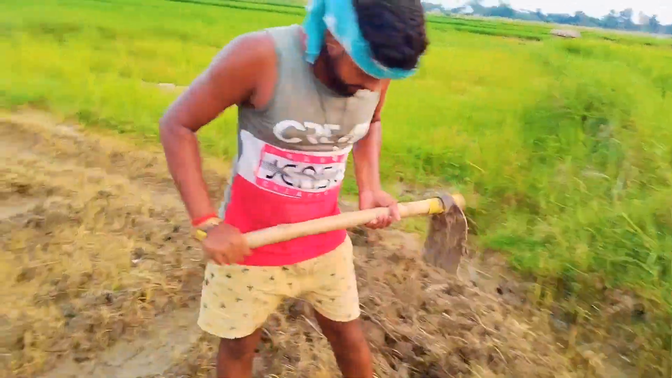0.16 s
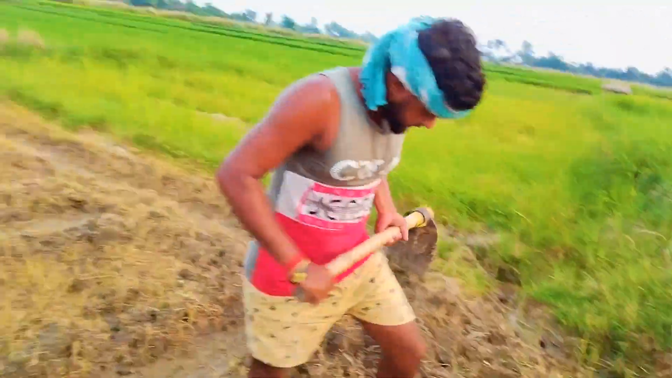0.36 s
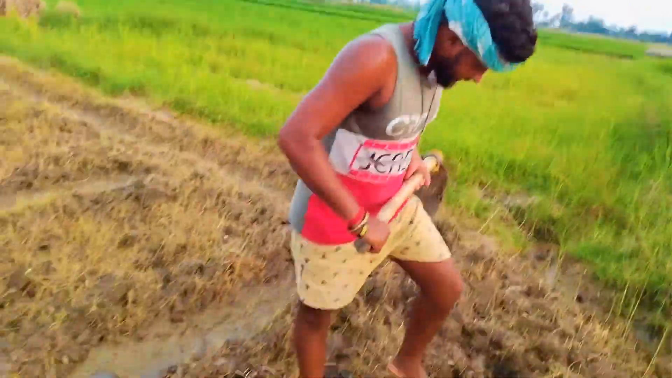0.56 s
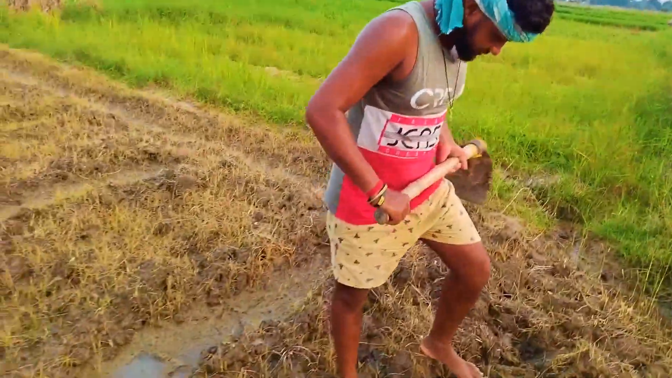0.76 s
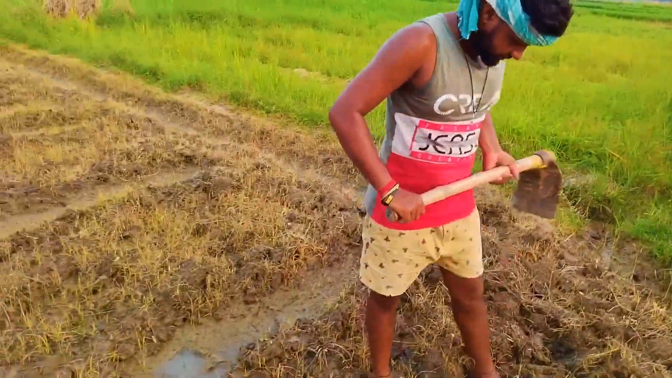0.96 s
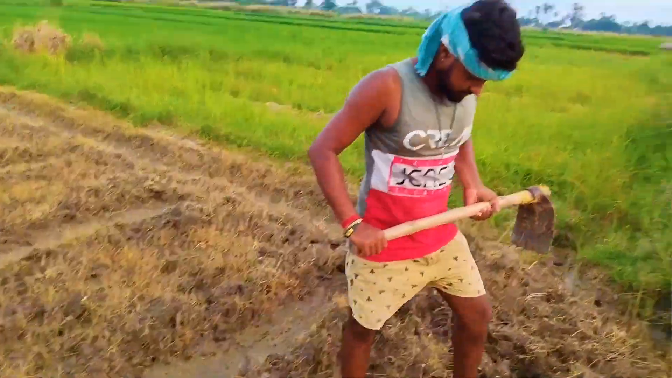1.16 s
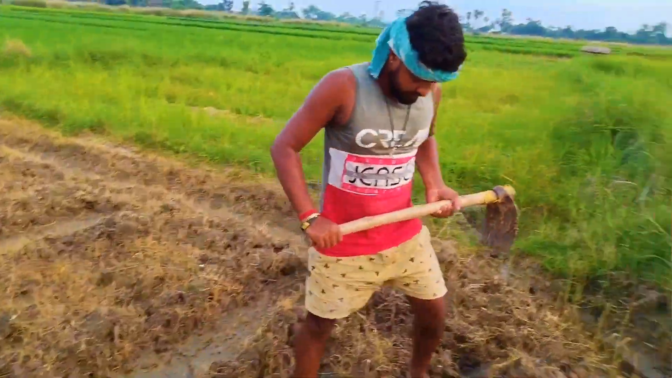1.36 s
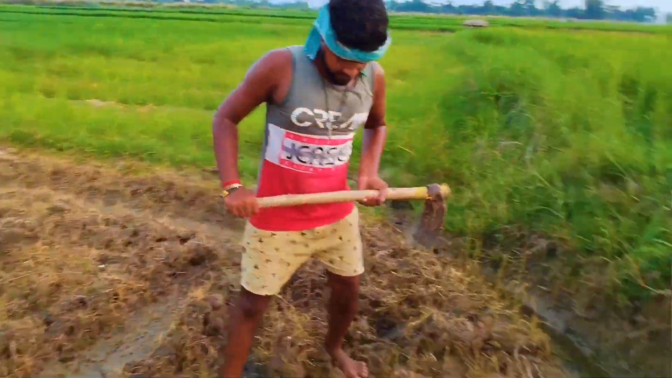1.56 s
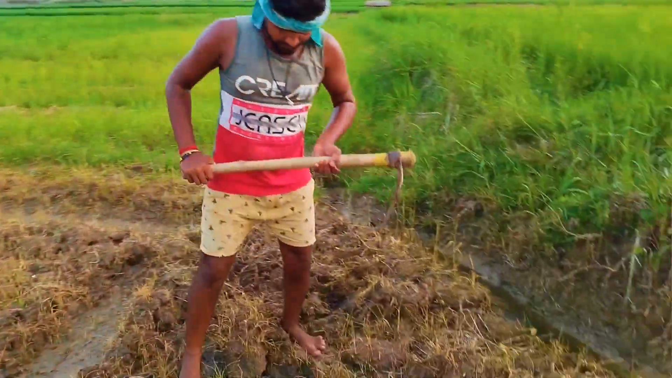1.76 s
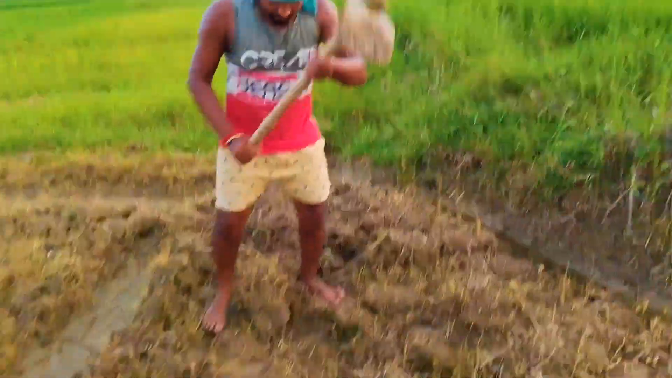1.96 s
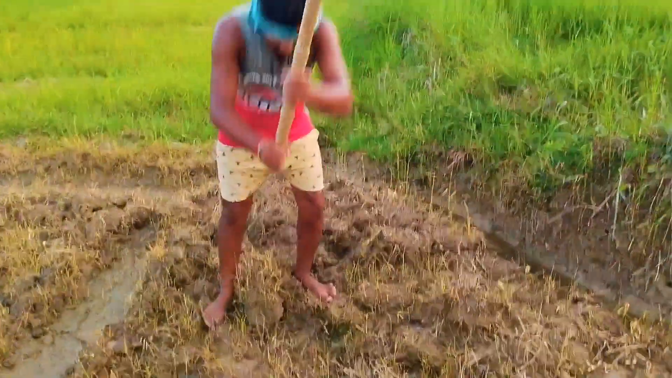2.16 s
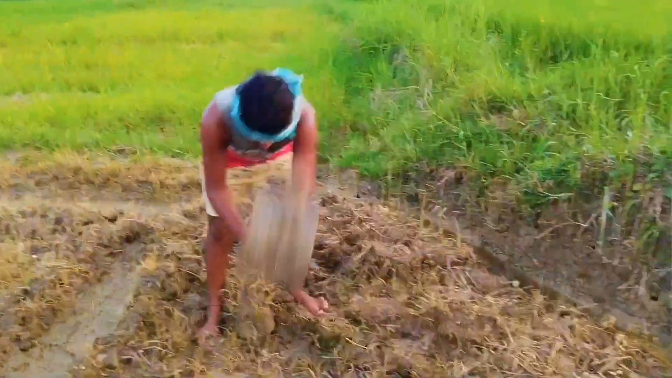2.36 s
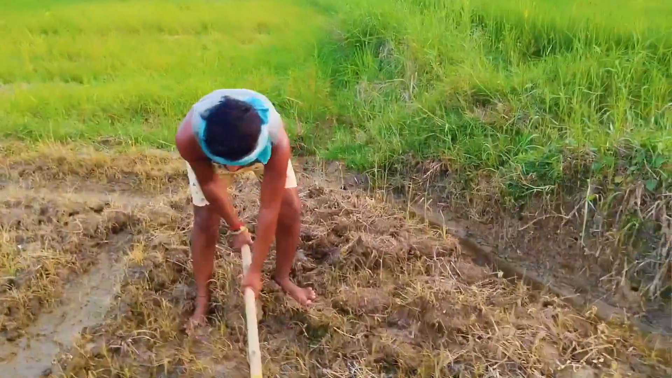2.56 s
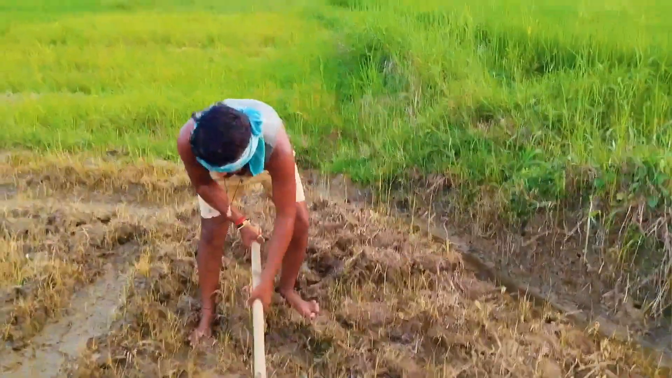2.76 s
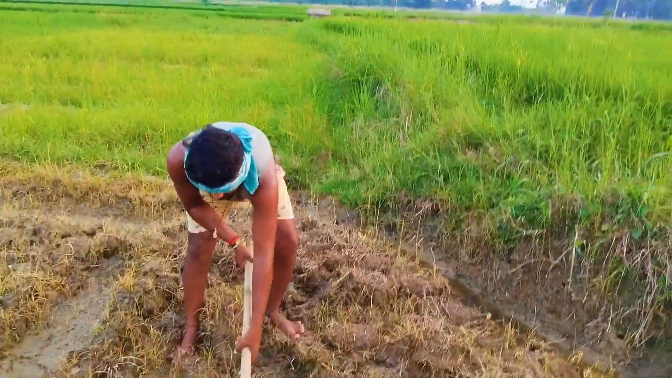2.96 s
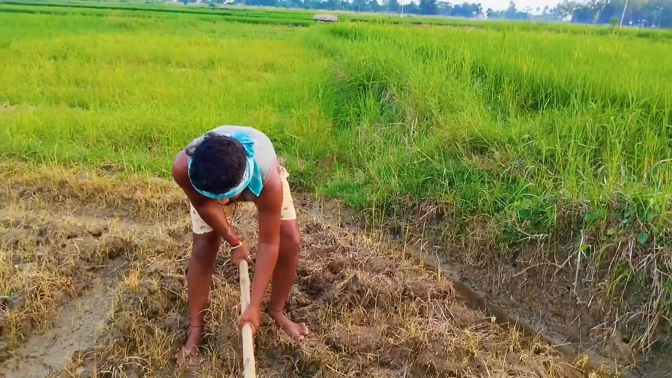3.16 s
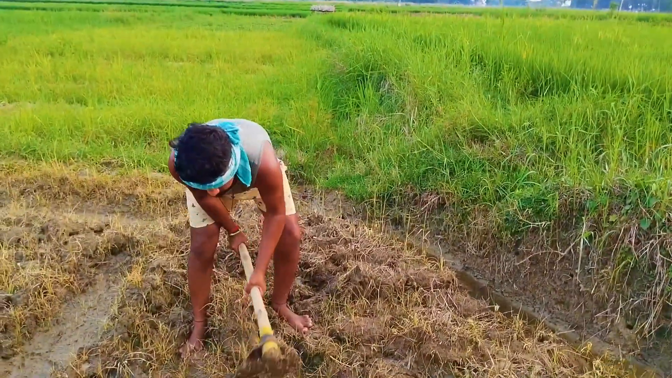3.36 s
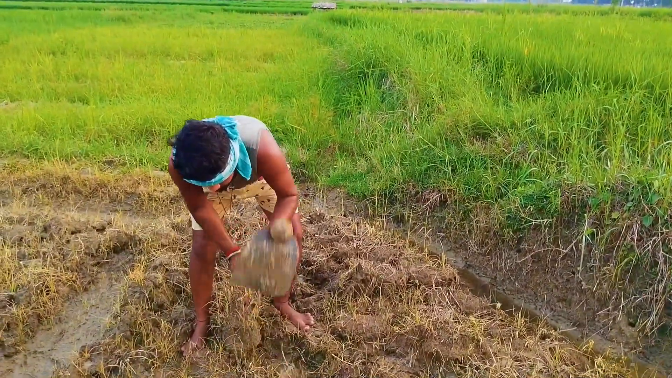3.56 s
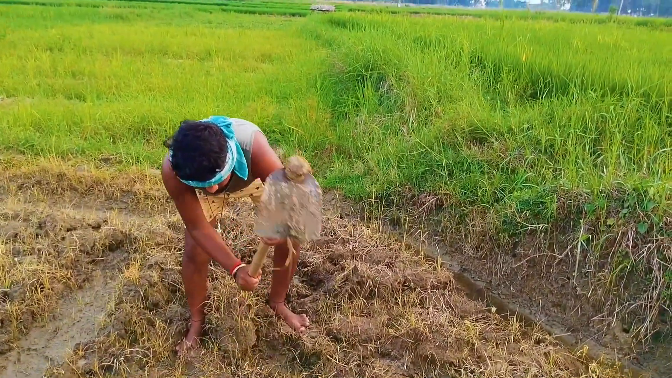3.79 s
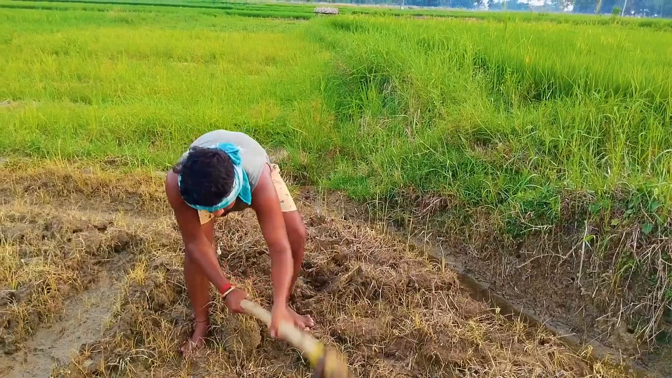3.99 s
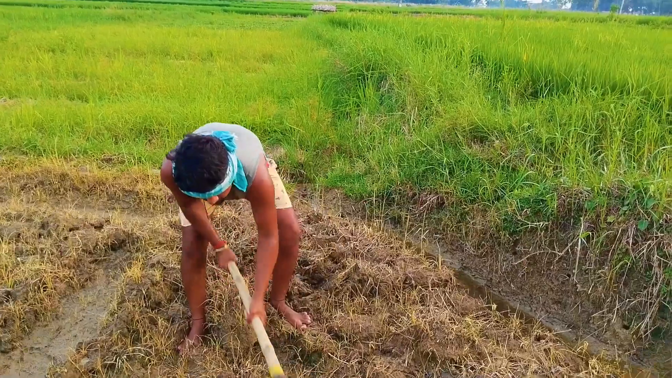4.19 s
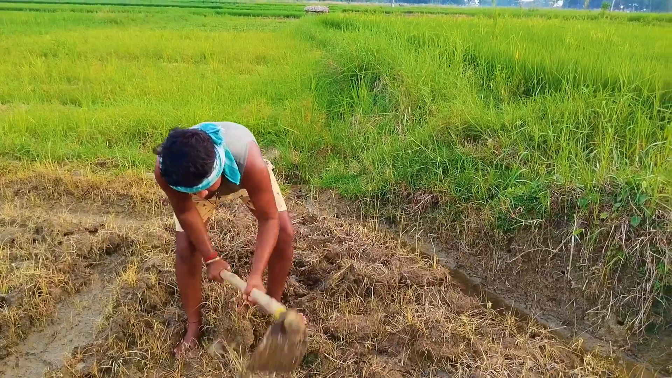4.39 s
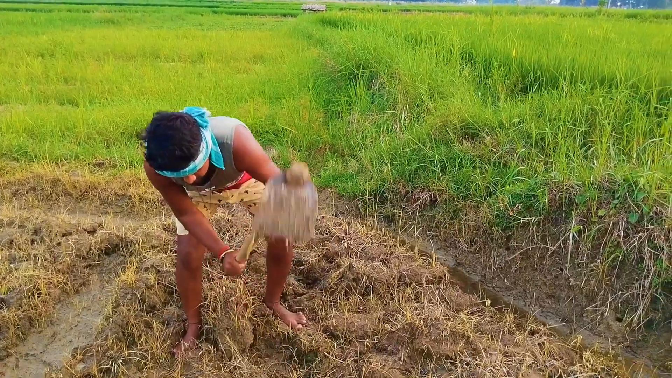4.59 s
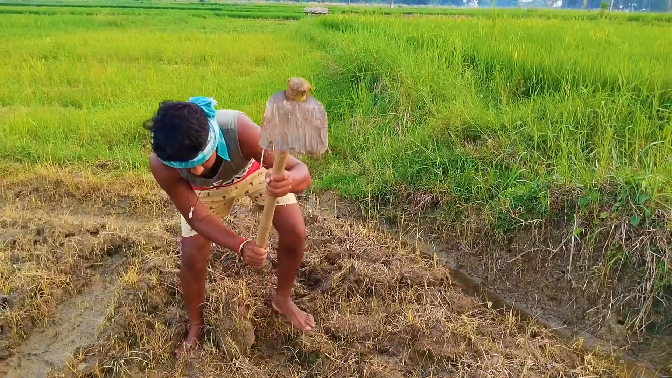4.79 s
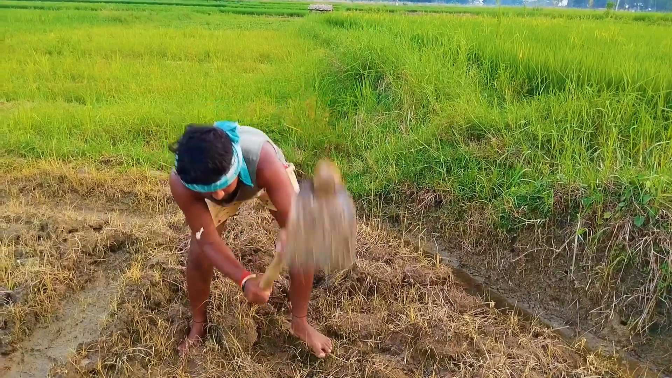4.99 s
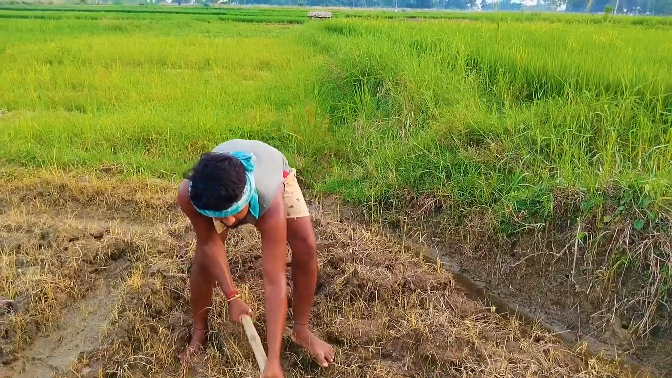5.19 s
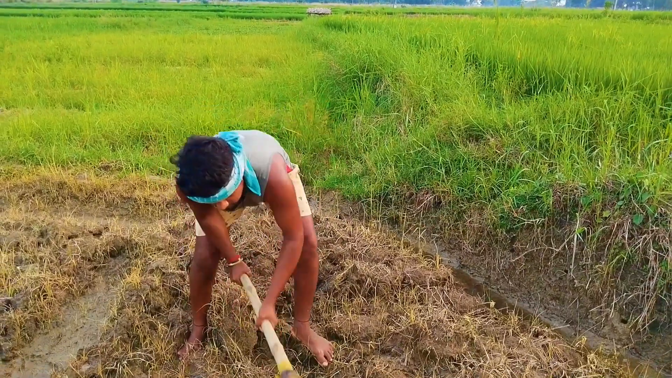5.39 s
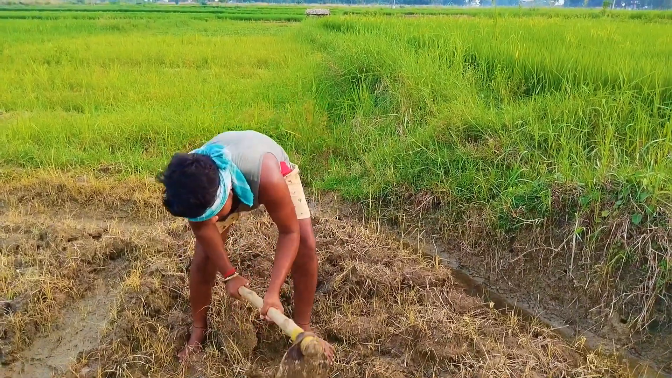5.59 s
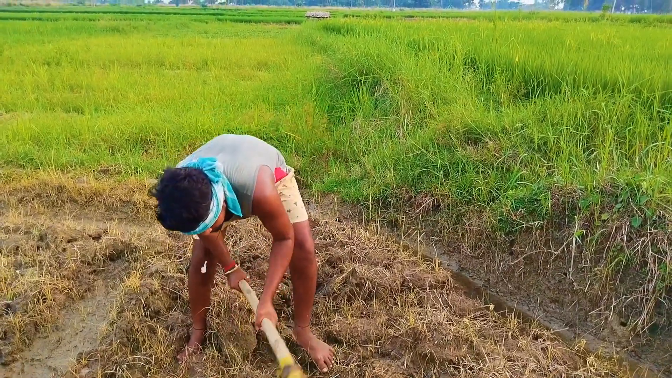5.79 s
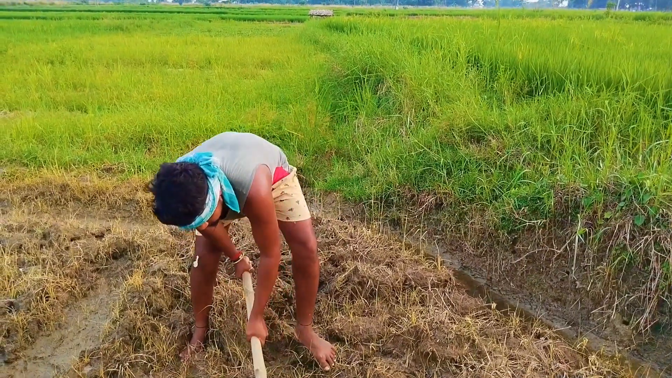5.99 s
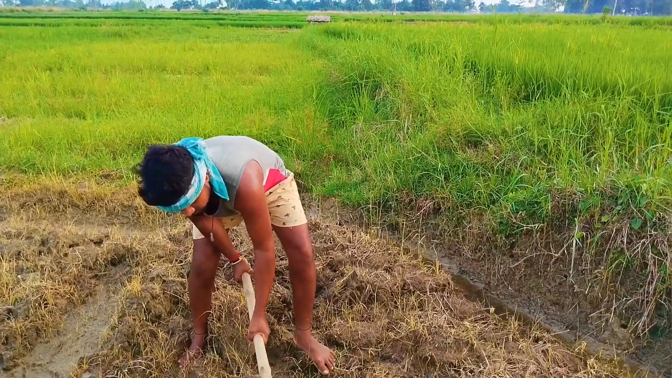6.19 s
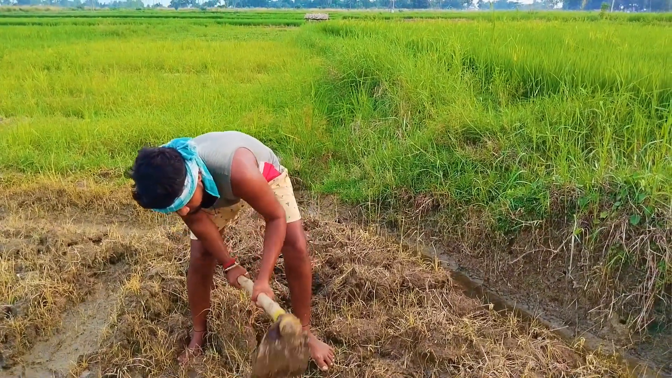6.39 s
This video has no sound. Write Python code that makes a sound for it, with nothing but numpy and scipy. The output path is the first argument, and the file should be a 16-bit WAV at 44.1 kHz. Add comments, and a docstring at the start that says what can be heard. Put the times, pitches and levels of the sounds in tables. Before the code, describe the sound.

Outdoors in an open field, feet shuffle faintly in straw while distant birds call and insects sing. Then a hand hoe strikes dry stubbly soil: three hard, gritty crunches with short ground thuds and a brief damped steel ring, then a lighter one. Between blows, soil drags and sifts, clods knock and stalks snap. The microphone is a few metres away, with a steady low rumble underneath.

```python
"""A hand hoe chops dry, stubbly soil in an open field: three hard blows and a light one, after shuffling steps.
Each blow is a burst of tiny fractures that crunches, with a short ground thud and a brief ring of the steel blade.
Between blows, swelling streams of fractures drag and sift soil, clods knock and dry stalks snap.
Birds call in smeared gliding tones and insects sing in narrow bands of noise.
Shaped noise makes the low rumble and thin air; a faint far drone comes and goes."""
import sys
import numpy as np
from scipy import signal
from scipy.fft import rfft, irfft
from scipy.io import wavfile
from scipy.ndimage import uniform_filter1d

SR = 44100
rng = np.random.default_rng(int(sys.argv[2]) if len(sys.argv) > 2 else 0)


def generate_wav(sig):
    """Save sig (samples, or channels by samples) to the path in sys.argv[1] as 16-bit PCM at SR."""
    pcm = np.round(np.clip(np.atleast_2d(sig).T, -1, 1) * 32767).astype(np.int16)
    wavfile.write(sys.argv[1], SR, pcm)


N = 284004
TIME = np.arange(N) / SR  # seconds through the scene
SIZE = 32768  # samples in one short sound
AGE = np.arange(SIZE) / SR  # seconds through one short sound

# Levels in the tables are settings before the mix; spectrum levels are relative.
# Blows, each cutting the crust and then seating in firm ground: [start_s, cut_db, cut_thud_db, sinking_s,
# seat_db, seat_thud_db, seat_thud_hz, decay_s, brightness_db_per_octave, blade_ring_db (relative to crunch)]
BLOWS = [(2.6476, -22, -28.5, 0.0085, -26.5, -30, 125.4, 0.011, 0.25, -10),
         (4.2211, -26.5, -26, 0.018, -22.5, -16, 293.5, 0.014, -1.9, -22),
         (5.3262, -23, -21.5, .013, -28.5, -34.5, 197, 0.014, 0, -12.5),
         (6.0279, -34.5, -37, 0.021, -38, -53, 260, 0.012, 0.5, -5)]
CUT_THUD_HZ = 262  # the crust's own thud
# Ringing tones of the steel blade on its handle: [pitch_hz, level_db]
BLADE_TONES = [(816, -3), (1020, -12), (1200, -21.5), (1750, 3), (2845, 4.5), (3060, -10.5), (3270, -13),
               (3480, 0.5), (3790, 1.5), (4160, -17.5), (4410, -22), (4820, -5.5)]
BLADE_T60_S = 0.045  # time for the ring to fall by 60 dB
# Colour of the crunch: [frequency_hz, level_db_per_hz]
CRUNCH_COLOUR = [(60, -24), (250, 6.5), (430, 4), (750, 0), (1500, 1), (2500, 0.5), (4500, 2), (6000, -6),
                 (9000, -6), (15500, -8)]
# Stereo width of the soil sounds: [frequency_hz, side_minus_middle_db]
SOIL_WIDTH = [(100, -22), (300, -12), (700, -4), (2500, -9), (6000, -2), (14000, 1)]

# The blade brushes stalks just before it cuts
STUBBLE_DB, STUBBLE_LEAD_S, STUBBLE_RISE_S = -43, 0.0044, 0.0095
# Soil spills after the blade seats; its level is relative to the seating crunch
SPILL_DB, SPILL_DELAY_S, SPILL_FALL_S = -20, 0.013, 0.022
# The blade pulls or levers soil: [peak_s, level_db, swell_s, brightness_db_per_octave, clod_weight_db]
DRAGS = [(2.921, -39.5, 0.033, -7.3, -7.5), (3.292, -49.5, 0.04, -6.5, -9), (3.73, -47.5, 0.017, -2.5, -2),
         (4.295, -41.5, 0.041, -4, -10), (5.435, -51, 0.04, -3.5, -0.5), (5.618, -53, .018, -6, -32),
         (6.378, -52, .023, -1, -1)]
# Loose soil sifts off the blade: [peak_s, level_db, swell_s, brightness_db_per_octave]
SIFTS = [(2.825, -59, 0.036, -7), (3.37, -60, 0.034, -4), (3.505, -58, 0.051, -3.5), (3.79, -58, 0.075, 8),
         (4.48, -66.5, .07, -1.5), (6.126, -66.5, .04, -1.5)]
SIFT_WEIGHT_DB = -20  # few heavy clods among it
# Feet and legs shift in the straw: [peak_s, level_db, swell_s, ground_weight_db]
STEPS = [(.115, -63, 0.062, 1.5), (.5, -67, 0.1, -1.5), (1.0, -65.5, 0.031, 3), (1.155, -60, 0.043, 16),
         (1.64, -63.5, 0.048, 18.5), (1.78, -61, .07, 12.5), (1.949, -65.5, 0.066, -24),
         (2.315, -57, .046, -43), (2.48, -66.5, .06, -17), (5.053, -60.5, .021, 14.5)]
STEP_TILT_DB = -2.5  # brightness per octave
# Colour of rubbed soil: [frequency_hz, level_db_per_hz]
DRAG_COLOUR = [(60, -20.5), (150, -20.5), (270, 3.5), (480, -5), (800, -13), (1800, 0), (3000, 2.5),
               (4500, 5.5), (6500, 0.5), (10000, 1.5), (15500, 0)]

# Clods and stones knock together or against the blade: [start_s, level_db, decay_s, pitch_hz]
KNOCKS = [(.038, -54, 0.0061, 2590), (.1305, -47.5, 0.0049, 1750), (1.741, -46, 0.0034, 1040),
          (2.778, -52, 0.063, 1570), (4.3065, -28, 0.0023, 1490), (4.49, -59, 0.0081, 1980),
          (5.3316, -9, 0.0017, 3240), (5.604, -45, 0.019, 1150), (5.772, -53.5, 0.011, 1270),
          (6.047, -35, 0.012, 1310), (6.162, -56.5, 0.021, 2400), (6.382, -48, 0.0041, 3130)]
KNOCK_WIDTH_SHARE = 0.36  # of the pitch
# Dry stalks snap: [start_s, level_db]
STALK_SNAPS = [(1.148, -43), (3.359, -40), (3.536, -47), (3.645, -52), (3.672, -46), (3.705, -42.5),
               (4.517, -56), (5.498, -43)]
STALK_DECAY_S, STALK_HZ, STALK_WIDTH_HZ = 0.0044, 5030, 11300

# Strength of the near reflection, which changes with the place of the blade: [time_s, share]
BOUNCE = [(2.9, 0.6), (4.25, 0.17), (5.33, 0.73), (6.05, 0.3)]

# A far bird's arched, rasping call: [start_s, length_s, pitch_hz, level_db]
RASPING_CALLS = [(0.301, 0.5, 1916, -64), (1.356, 0.58, 1847, -63), (5.76, .3, 1490, -77)]
CALL_ARCH_HZ, CALL_RASP_HZ = 240, 102
# Thin rising whistles of another bird: [start_s, length_s, pitch_hz, rise_hz, level_db]
WHISTLES = [(0.253, 0.051, 3650, 500, -64), (0.882, 0.24, 2300, 526, -68), (1.257, 0.24, 3090, 90, -72.5)]
WHISTLE_RASP_HZ = 71.5

# Steady insect choirs: [pitch_hz, width_hz, level_db]
CHOIRS = [(7080, 350, -85.5), (7986, 510, -76.5), (9340, 700, -77), (10700, 940, -72.5)]
# Nearness of the choirs: [time_s, level_db]
CHOIR_SWELL = [(0, 4.5), (2, 5.5), (2.7, 3), (5.6, 3), (6.44, 4.5)]
# The cricket sings in bouts: [start_s, end_s, level_db]
CRICKET_BOUTS = [(.25, .55, -70), (1.36, 2.7, -64), (5.2, 6.44, -68)]
CRICKET_FADE_S, CRICKET_REST_DB = 0.08, -74

# Colour of the low rumble: [frequency_hz, level_db_per_hz]
RUMBLE_COLOUR = [(15, -46.5), (28, -26), (39, -7.5), (50, -3), (62, 1), (75, 0), (92, -4), (125, -11),
                 (165, -17), (220, -35), (330, -38), (600, -64)]
# Loudness of the low rumble: [time_s, level_db]
RUMBLE_LEVEL = [(0, -52), (2.4, -52), (4.6, -54), (6.44, -52.5)]
# Colour of the thin open-air hiss: [frequency_hz, level_db_per_hz]
AIR_COLOUR = [(200, 10.5), (450, -39), (650, 1), (1200, -5.5), (2000, -2.5), (3200, -8.5), (5800, -15.5),
              (7200, -7.5), (12000, -5), (15500, 2)]
# A far drone comes and goes: [start_s, end_s, level_db]
DRONE_BOUTS = [(.45, 1.1, -84), (1.58, 2.4, -76), (5.87, 6.44, -82.5)]
DRONE_HZ, DRONE_FADE_S, DRONE_REST_DB = 590, 0.067, -93.5
CUTOFF_HZ = 15700


def from_db(db):
    """Turn decibels into gain."""
    return 10 ** (np.asarray(db) / 20)


def rms_one(x):
    """Scale to an average strength (rms) of one."""
    return x / np.sqrt(np.mean(x ** 2) + 1e-20)


def in_time(rows):
    """Read a table of times and values at every sample."""
    times, values = np.transpose(rows)
    return np.interp(TIME, times, values)


def bins(size):
    """Frequencies in the spectrum of this many samples, kept at 1 Hz or more."""
    return np.maximum(np.arange(size // 2 + 1) * SR / size, 1)


def at_hz(points, hz):
    """Read a spectrum on a log-frequency axis."""
    f, db = np.transpose(points)
    return np.interp(np.log(hz), np.log(f), db)


def tilt(db_per_octave, hz):
    """Brightness slope around 2000 Hz, level below 500 Hz."""
    return db_per_octave * np.log2(np.maximum(hz, 500) / 2000)


def hump(hz, centre_hz, width_hz, order=2):
    """Resonance curve in dB, steeper with its order."""
    return -10 * order * np.log10(1 + ((hz ** 2 - centre_hz ** 2) / (hz * width_hz)) ** 2 / order)


def coloured(x, db):
    """Filter that acts only after each input (minimum phase) and keeps the power of white noise."""
    size = x.shape[-1]
    cepstrum = irfft(np.log(rms_one(from_db(db)) + 1e-6), size)
    # Folding the cepstrum onto its first half gives the minimum phase
    cepstrum[1:size // 2] *= 2
    cepstrum[size // 2 + 1:] = 0
    return irfft(rfft(x) * np.exp(rfft(cepstrum)), size)


def stereo(pair, side_db):
    """Use two signals as the middle and the side of a stereo sound."""
    side = irfft(rfft(pair[1]) * from_db(side_db), pair.shape[-1])
    return np.array([pair[0] + side, pair[0] - side])


def add(out, s, sound):
    """Mix a sound in from time s, trimmed to the scene."""
    start = round(s * SR)
    first, last = max(start, 0), min(start + sound.shape[-1], N)
    out[:, first:last] += sound[:, first - start:last - start]


def grains(per_s, spread_db, clump_db):
    """Two streams of tiny fractures of uneven size, clumped over a few milliseconds."""
    born = rng.random((2, SIZE)) < per_s / SR
    sizes = rng.standard_normal((2, SIZE)) * from_db(spread_db * np.minimum(rng.exponential(1, (2, SIZE)), 4))
    clumps = rms_one(uniform_filter1d(rng.standard_normal(SIZE), size=110))
    return rms_one(born * sizes * from_db(clump_db * np.clip(clumps, -2, 2)))


def burst(decay_s, attack_s):
    """Quick rise and fading tail of a contact."""
    return np.exp(-AGE / decay_s) * (1 - np.exp(-AGE / attack_s))


def blade(force):
    """Every fracture at the edge rings the tones of the blade, which the soil damps quickly."""
    ringing = sum(from_db(db) * np.sin(2 * np.pi * hz * AGE) for hz, db in BLADE_TONES)
    ringing = ringing * from_db(-60 * AGE / BLADE_T60_S)
    return signal.fftconvolve(force, ringing[None] / np.linalg.norm(ringing))[:, :SIZE]


def contacts():
    """Cut and seat of each blow: start_s, crunch_db, decay_s, brightness, blade_db, thud_db, thud_hz."""
    rows = []
    for s, cut_db, cut_thud_db, sink, seat_db, seat_thud_db, seat_hz, decay, bright, ring_db in BLOWS:
        rows.append((s, cut_db, decay, bright, cut_db + ring_db, cut_thud_db, CUT_THUD_HZ))
        rows.append((s + sink, seat_db, decay, bright, seat_db + ring_db, seat_thud_db, seat_hz))
    return rows


def bites(attack_s=0.00052, thud_cycles=1.89, thud_rise_s=0.0026, extra_ring_db=2):
    """The edge breaks crust and ground in bursts of grains, each with a short thud."""
    out, hz = np.zeros((2, N)), bins(SIZE)
    for s, db, decay, bright, blade_db, thud_db, thud_hz in contacts():
        force = grains(per_s=16000, spread_db=0.84, clump_db=0.5) * burst(decay, attack_s)
        crunch = from_db(db) * coloured(force, at_hz(CRUNCH_COLOUR, hz) + tilt(bright, hz))
        steel = from_db(blade_db + extra_ring_db) * blade(force)
        # A lower thud lasts longer
        thud = np.sin(2 * np.pi * thud_hz * AGE) * burst(thud_cycles / thud_hz, thud_rise_s)
        add(out, s, stereo(crunch + steel, at_hz(SOIL_WIDTH, hz)) + from_db(thud_db) * thud)
    return out


def strokes(stubble_tilt_db=-1.4, stubble_weight_db=5, spill_tilt_db=-3, spill_weight_db=7):
    """All that rubs soil and stubble: peak_s, level_db, rise_s, fall_s, brightness, weight_db."""
    rows = [(s, db, swell, swell, STEP_TILT_DB, weight_db) for s, db, swell, weight_db in STEPS]
    rows += [(s, db, swell, swell, bright, weight_db) for s, db, swell, bright, weight_db in DRAGS]
    rows += [(s, db, swell, swell, bright, SIFT_WEIGHT_DB) for s, db, swell, bright in SIFTS]
    for s, _, _, sink, seat_db, *_ in BLOWS:
        rows.append((s - STUBBLE_LEAD_S, STUBBLE_DB, STUBBLE_RISE_S, STUBBLE_RISE_S,
                     stubble_tilt_db, stubble_weight_db))
        rows.append((s + sink + SPILL_DELAY_S, seat_db + SPILL_DB, SPILL_DELAY_S, SPILL_FALL_S,
                     spill_tilt_db, spill_weight_db))
    return rows


def crumbs(per_s=290, spread_db=5.5, cycles=11, low_hz=750, high_hz=5200, count=22):
    """Dry lumps crack one by one, each with a very short tone at one of a set of pitches; unit rms."""
    out = np.zeros(N)
    for hz in np.geomspace(low_hz, high_hz, count):
        at = np.flatnonzero(rng.random(N) < per_s / count / SR)
        clicks = np.full(N, 1e-18)
        sizes = from_db(spread_db * np.minimum(rng.exponential(1, N)[at], 3))
        clicks[at] = sizes * np.sign(rng.random(N)[at] - 0.5)
        # A two-pole filter answers each click with a dying tone
        r, w = np.exp(-hz / (cycles * SR)), 2 * np.pi * hz / SR
        out += signal.lfilter([0, np.sin(w)], [1, -2 * r * np.cos(w), r * r], clicks) * np.sqrt(hz)
    return rms_one(out)


def scrapes(clod_hz=480, steel_db=-11, grit_db=-1.5, crumb_db=-5.5, firm_db=-54, lurch_db=1.47,
            lurches_per_s=90):
    """Strokes swell, catch unevenly and fade; grit crackles, lumps crack and heavy clods add body."""
    out, effort, hz = np.zeros((2, N)), np.zeros((1, N)), bins(SIZE)
    middle = AGE[SIZE // 2]
    for s, db, rise, fall, bright, weight_db in strokes():
        away = np.maximum((middle - AGE) / rise, (AGE - middle) / fall)
        lurch = np.interp(AGE * lurches_per_s, np.arange(SIZE), rng.standard_normal(SIZE))
        stroke = from_db(db + lurch_db * lurch) * np.exp(-0.5 * away ** 2)
        force = grains(per_s=11000, spread_db=2.0, clump_db=1.0) * stroke
        body_db = weight_db / (1 + np.square(hz / clod_hz) ** 2)
        soil = coloured(force, at_hz(DRAG_COLOUR, hz) + body_db + tilt(bright, hz))
        add(out, s - middle, stereo(soil + from_db(steel_db) * blade(force), at_hz(SOIL_WIDTH, hz)))
        add(effort, s - middle, stroke[None])
    firmness = effort / np.hypot(effort, from_db(firm_db))  # light strokes only brush the straw
    return from_db(grit_db) * out + from_db(crumb_db) * effort * firmness * crumbs()


def breaks():
    """Clods knock at their own pitches, stalks snap alike: start_s, level_db, decay_s, pitch_hz, width_hz."""
    knocks = [(s, db, decay, hz, KNOCK_WIDTH_SHARE * hz) for s, db, decay, hz in KNOCKS]
    return knocks + [(s, db, STALK_DECAY_S, STALK_HZ, STALK_WIDTH_HZ) for s, db in STALK_SNAPS]


def snaps(attack_s=0.0012):
    """A clod knocks or a stalk gives way: a short burst of grains in one broad resonance."""
    out, hz = np.zeros((2, N)), bins(SIZE)
    for s, db, decay, pitch_hz, width_hz in breaks():
        force = grains(per_s=5000, spread_db=-1.5, clump_db=-4.0) * burst(decay, attack_s)
        snap = coloured(force, hump(hz, pitch_hz, width_hz))
        add(out, s, from_db(db) * stereo(snap, at_hz(SOIL_WIDTH, hz)))
    return out


def patter(patter_db=-8):
    """Single crumbs land while soil sifts off the blade."""
    flow = sum(from_db(db) * np.exp(-0.5 * ((TIME - s) / swell) ** 2) for s, db, swell, _ in SIFTS)
    return from_db(patter_db) * flow * crumbs(per_s=290, spread_db=2.5, cycles=16, low_hz=1006, high_hz=4930)


def field(x, bounce_hz=3500, bounce_s=0.00096, scatter_db=-23, scatter_decay_s=0.0047):
    """One dull near reflection hollows the sound; the banks scatter a faint short tail."""
    hz = bins(N)
    delay = np.exp(-2j * np.pi * hz * bounce_s)
    mirror = irfft(rfft(x) * delay / (1 + (hz / bounce_hz) ** 2), N)
    tail = coloured(rng.standard_normal((2, SIZE)), at_hz(DRAG_COLOUR, bins(SIZE)))
    tail = tail * np.exp(-AGE / scatter_decay_s)
    scattered = signal.fftconvolve(x, tail / np.linalg.norm(tail[0]), axes=1)[:, :N]
    return x + in_time(BOUNCE) * mirror + from_db(scatter_db) * scattered


def far_tone(hz, blur_hz):
    """A steady or gliding tone smeared into a narrow band by two slow random signals."""
    low_pass = signal.butter(2, blur_hz, fs=SR, output="sos")
    a, b = signal.sosfilt(low_pass, rng.standard_normal((2, 2, len(hz))))
    phase = 2 * np.pi * np.cumsum(hz) / SR
    return stereo(rms_one(a * np.cos(phase) + b * np.sin(phase)), side_db=-1.5)


def songs():
    """Calls arch, whistles rise: start_s, length_s, first_hz, last_hz, arch_hz, level_db, rasp_hz."""
    calls = [(s, length, hz, hz, CALL_ARCH_HZ, db, CALL_RASP_HZ) for s, length, hz, db in RASPING_CALLS]
    return calls + [(s, length, hz, hz + rise_hz, 0, db, WHISTLE_RASP_HZ)
                    for s, length, hz, rise_hz, db in WHISTLES]


def birds(strand_gap=1.9, strand_blur=0.37, side_strand_db=-3, falter_db=3):
    """Calls arch or rise in pitch and swell; a buzz in the throat puts a strand on either side."""
    out = np.zeros((2, N))
    for s, length, first_hz, last_hz, arch_hz, db, rasp_hz in songs():
        along = np.minimum(AGE / length, 1)
        swell = np.abs(np.sin(np.pi * along))
        hz = first_hz + (last_hz - first_hz) * along + arch_hz * swell
        # The rasp setting scales both the gap between strands and their blur
        strands = sum(from_db(side_strand_db * abs(k))
                      * far_tone(hz + k * strand_gap * rasp_hz, strand_blur * rasp_hz) for k in (-1, 0, 1))
        # Syllables of uneven strength
        falter = np.interp(AGE, np.linspace(0, AGE[-1], 20), rng.standard_normal(20))
        add(out, s, from_db(db + falter_db * falter) * swell * rms_one(strands))
    return out


def wash(spectrum_db, side_db):
    """Steady stereo noise of one colour."""
    return stereo(coloured(rng.standard_normal((2, N)), spectrum_db), side_db)


def wander(turns_per_s=2.5):
    """A slow random rise and fall."""
    turns = np.arange(0, TIME[-1] + 1, 1 / turns_per_s)
    return np.interp(TIME, turns, rng.standard_normal(len(turns)))


def bouts(rows, fade_s, rest_db):
    """Gain that swells, holds and fades in each bout, over a faint resting level."""
    gain = from_db(rest_db)
    for start, end, db in rows:
        gain = gain + from_db(db) * (np.tanh((TIME - start) / fade_s) - np.tanh((TIME - end) / fade_s)) / 2
    return gain


def insects(cricket_hz=9520, cricket_width_hz=400, chirp_period_s=0.1, first_chirp_s=0.105,
            chirp_depth=0.6, swell_db=1.0):
    """Far insects blur into swelling narrow bands; a nearer cricket pulses about ten times a second."""
    hz = bins(N)
    choir = sum(from_db(db + swell_db * wander()) * wash(hump(hz, pitch_hz, width_hz), side_db=1.5)
                for pitch_hz, width_hz, db in CHOIRS)
    # Each chirp varies in timing and strength
    beats = np.arange(0, TIME[-1] + chirp_period_s, chirp_period_s)
    waver, vigour = (np.interp(TIME, beats, draw) for draw in rng.standard_normal((2, len(beats))))
    wings = np.cos(2 * np.pi * (TIME - first_chirp_s) / chirp_period_s + 0.5 * waver)
    chirps = from_db(2 * vigour) * (1 + chirp_depth * np.tanh(2 * wings + 0.5)) / 2
    cricket = chirps * wash(hump(hz, cricket_hz, cricket_width_hz, order=3), side_db=1.5)
    cricket_gain = bouts(CRICKET_BOUTS, CRICKET_FADE_S, CRICKET_REST_DB)
    return from_db(in_time(CHOIR_SWELL)) * choir + cricket_gain * cricket


def background(air_db=-67.5):
    """Shaped noise for low rumble and thin open-air hiss, with a smeared tone for the far drone."""
    hz = bins(N)
    rumble = from_db(in_time(RUMBLE_LEVEL)) * wash(at_hz(RUMBLE_COLOUR, hz), side_db=-26.5)
    air_width_db = at_hz([(500, 7.0), (8000, -4)], hz)  # wider in the lows
    air = from_db(air_db) * wash(at_hz(AIR_COLOUR, hz), side_db=air_width_db)
    drone_gain = bouts(DRONE_BOUTS, DRONE_FADE_S, DRONE_REST_DB)
    drone = drone_gain * far_tone(np.full(N, DRONE_HZ), blur_hz=22.9)
    return rumble + air + drone


def scene():
    """The hoe at work in the field, among insects and birds."""
    hoe = bites() + scrapes() + snaps() + patter()
    return field(hoe) + insects() + birds() + background()


def record(dry):
    """Cut the top steeply with a low-pass filter."""
    return signal.sosfilt(signal.ellip(12, 0.1, 80, CUTOFF_HZ, fs=SR, output="sos"), dry)


dry = scene()
out = record(dry)
generate_wav(out)
```